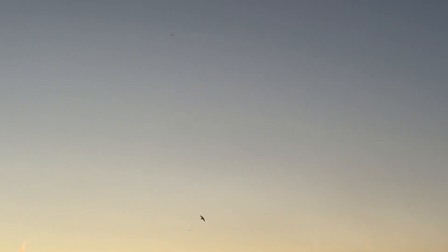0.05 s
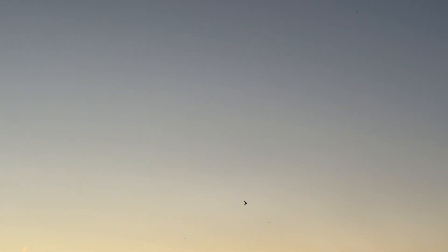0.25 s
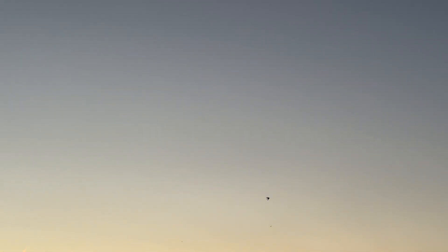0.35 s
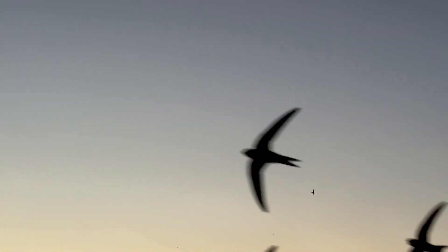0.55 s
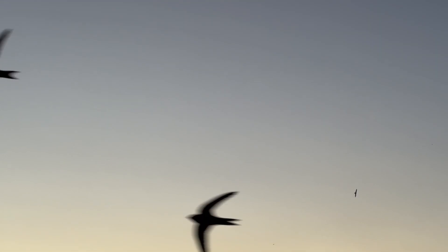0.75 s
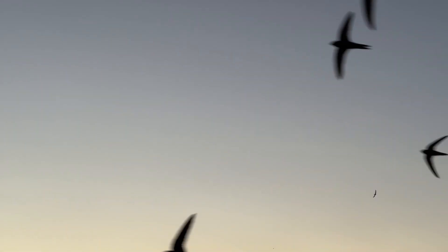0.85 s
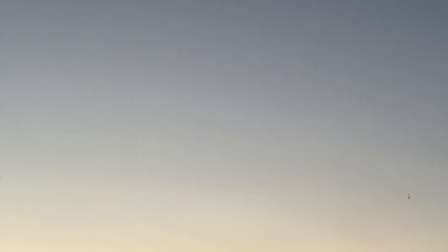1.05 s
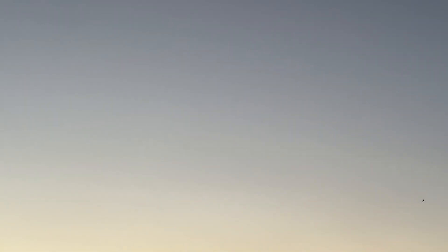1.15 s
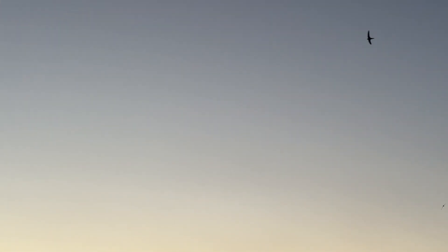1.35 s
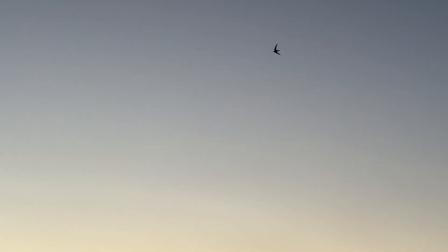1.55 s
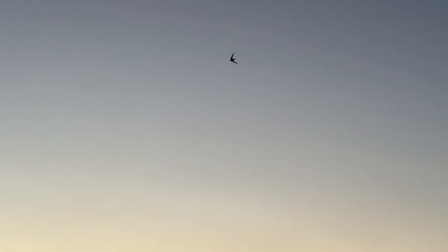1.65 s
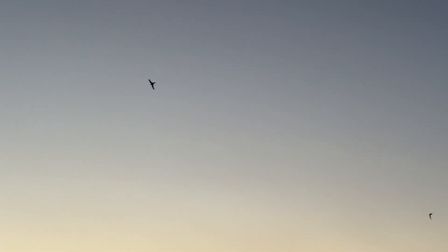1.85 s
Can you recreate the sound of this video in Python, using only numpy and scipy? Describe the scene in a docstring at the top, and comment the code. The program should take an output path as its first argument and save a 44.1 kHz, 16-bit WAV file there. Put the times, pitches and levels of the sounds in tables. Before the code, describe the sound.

Swifts scream in open air, starting faintly and swelling from 0.2 s. Very high, thin whistles scoop upward and trill rapidly, overlapping and loudest at about 0.5-0.9 s as the birds pass close. Rapid ticking chatter cuts in around 0.65-1.0 s, with descending pips until 1.1 s. Slight dull echoes follow. Weaker calls trail off to 1.9 s over a blurred distant flock and faint low hum.

```python
"""Open air at dusk, with roofs and walls about: a party of swifts races low over the microphone and draws away.
They scream over one another: each scream is a whistle near 6 kHz that scoops upward under a very fast trill.
Short pips of the same voice and the chatter of the nearest birds, in falling ticks, cut through; coloured noise
follows the loudness of both. There are dull echoes of scattered noise, a few faint low undertones made of
gliding sines, and, behind, a far flock and a low hum, both made of coloured noise."""
import sys
import numpy as np
from scipy import signal
from scipy.fft import rfft, irfft
from scipy.io import wavfile
from scipy.ndimage import uniform_filter1d

SR = 44100
rng = np.random.default_rng(int(sys.argv[2]) if len(sys.argv) > 2 else 0)


def generate_wav(signal):
    """Clip the signal to [-1, 1] and save it as 16-bit WAV at the path in sys.argv[1]."""
    frames = np.transpose(np.atleast_2d(signal))
    scaled = np.clip(frames, -1, 1) * 32767
    pcm = np.round(scaled).astype(np.int16)
    wavfile.write(sys.argv[1], SR, pcm)


N = 83790  # samples, 1.9 s

# level of the partials and noise around the whistle, lowest once the birds face away: (time [s], level [dB])
RICHNESS = [(.1, 5), (.35, -1.5), (.9, 1), (1.2, -6)]


def screams():
    """Long calls overhead that scoop up clean, level off and trill ever more deeply."""
    # one row per scream: (full trill depth [Hz], its curve of (time [s], pitch [Hz], level [dB]))
    scream_curves = [ (292, [(.017, 4370, -50), (.026, 5260, -47.5), (.055, 5960, -40), (.12, 6200, -36.5),
                     (.27, 6700, -31.5)]), (180, [(.126, 4605, -61), (.138, 5395, -41.5), (.16, 5990, -38),
                     (.24, 6140, -47)]), (444, [(.202, 5070, -41), (.215, 5850, -33.5), (.24, 6490, -26),
                     (.3, 6830, -22.5), (.365, 7050, -22.5), (.42, 7010, -23), (.48, 6670, -24),
                     (.54, 6500, -31)]), (148, [(.219, 4690, -48.5), (.24, 5450, -36.5), (.29, 6090, -32),
                     (.39, 6290, -28.5), (.515, 6290, -23.5)]), (148, [(.473, 4483, -48.5),
                     (.49, 5000, -42.5), (.562, 5700, -42), (.572, 5720, -26.5), (.595, 5890, -21.5),
                     (.63, 6565, -18)]), (100, [(.55, 5222, -30), (.558, 5862, -28), (.6, 6238, -27),
                     (.73, 6072, -21.5)]), (107, [(.507, 5330, -31), (.525, 5940, -20), (.55, 6130, -18.5),
                     (.625, 6260, -21), (.69, 6168, -15.5), (.725, 5940, -21.5)]),
                     (240, [(.587, 4450, -40.5), (.604, 5590, -33), (.635, 5900, -25.5), (.73, 6050, -25),
                     (.742, 6106, -18), (.8, 6177, -21.5), (.86, 6183, -21), (.902, 6270, -22.5)]),
                     (120, [(.625, 5300, -28), (.655, 5934, -35), (.78, 5835, -36)]),
                     (200, [(.772, 4820, -30), (.789, 5600, -23), (.812, 5885, -23), (.9, 5955, -38)]),
                     (99, [(.83, 4950, -37), (.852, 5466, -30), (.895, 5557, -31.5), (.925, 5650, -37),
                     (1.06, 5890, -41)]), (150, [(1.064, 4070, -54), (1.105, 4240, -53),
                     (1.148, 4900, -48)]), (110, [(1.078, 4900, -42), (1.1, 5480, -34.5),
                     (1.14, 5840, -36.5), (1.18, 5900, -41.5), (1.245, 6000, -36), (1.39, 5960, -56)]),
                     (50, [(1.133, 4220, -43), (1.16, 5025, -33.5), (1.184, 4920, -41), (1.197, 5400, -38),
                     (1.255, 5426, -37.5), (1.335, 5410, -50), (1.42, 5290, -50), (1.445, 5470, -46),
                     (1.48, 5440, -52), (1.57, 5310, -51)]), (70, [(1.566, 4650, -54), (1.582, 5060, -54),
                     (1.69, 5290, -75)]), (75, [(1.642, 4580, -52), (1.665, 4740, -48.5),
                     (1.695, 5120, -61), (1.728, 5396, -44), (1.76, 5600, -48), (1.88, 5660, -53)]),
                     (50, [(1.885, 4500, -60), (1.93, 4900, -55)]), ]
    attack_s, release_s = 0.0033, 0.011
    start_depth_hz = 53.7
    grown_share = 0.68  # share of the scream after which the trill is full
    out = np.zeros(N)
    for full_depth_hz, curve in scream_curves:
        times, pitches, levels = np.transpose(curve)
        start, end = times[0], times[-1]
        t = np.arange(start, end, 1 / SR)
        edges = np.clip(np.minimum((t - start) / attack_s, (end - t) / release_s), 0, 1)
        growth = np.minimum(np.linspace(0, 1, len(t)) / grown_share, 1) ** 2
        depth_hz = start_depth_hz + (full_depth_hz - start_depth_hz) * growth
        hz = np.interp(t, times, pitches)
        db = np.interp(t, times, levels)
        add(out, start, edges * voice(start, hz, db, depth_hz))
    return out


def voice(start, hz, db, depth_hz):
    """A whistle and its partials; an uneven trill shakes the pitch, and the sound pulses loudest as it falls."""
    # partials: multiples of the whistle's pitch [ratio], and beside them their levels [dB]
    multiples = [.5, 1, 1.5, 2, 2.5]
    partial_db = [-44.5, -1, -27, -18, -38]
    # colour of throat and beak on the partials other than the whistle: (frequency [Hz], level [dB])
    throat = [(10500, 0), (12300, 0.5), (13800, -3.5), (15300, 2)]
    trill_hz, trill_wander = 255.1, 0.057  # middle pace; wander as a share of it
    trill_uneven = 0.25  # spread of the depth, as a share
    jitter_hz, waver_hz = 33.6, 13.2  # quick and slower spread of pitch
    pulse_scale_hz, pulse_lag_rad = 510, 0.1  # trill depth at which pulsing nears its full strength
    flutter_db, swell_db = 2, 1.07  # spread for each partial, and for the whole voice

    size = len(hz)
    pace_wander = rng.normal() + 2 * drift(171, size)  # one draw per call, plus a moving part
    trill = phase_of(trill_hz * (1 + trill_wander * pace_wander))
    swing = depth_hz * (1 + trill_uneven * drift(230, size)) * np.cos(trill)
    unsteadiness = jitter_hz * drift(650, size) + waver_hz * drift(53.3, size)
    phase = phase_of(hz + swing + unsteadiness)
    pulsing = 1 + np.tanh(depth_hz / pulse_scale_hz) * np.sin(trill - pulse_lag_rad)
    richness = np.interp(start + np.arange(size) / SR, *np.transpose(RICHNESS))
    tone = np.zeros(size)
    for multiple, level in zip(multiples, partial_db):
        colour = richness + np.interp(multiple * hz, *np.transpose(throat))
        if multiple == 1:
            colour = 0  # the whistle itself keeps its level
        gain = from_db(db + level + colour + flutter_db * drift(184, size))
        tone += gain * np.sin(multiple * phase)
    swell = from_db(swell_db * drift(14.3, size))
    return np.sqrt(2) * tone * pulsing * swell


def pips():
    """Brief, slightly falling bursts of the same voice."""
    # one row per pip: (time of its middle [s], middle pitch [Hz], level [dB])
    pip_list = [(.01, 6420, -38.5), (0.037, 6700, -39), (0.489, 5860, -25), (.563, 6440, -14),
                (.588, 6330, -14.5), (.639, 6250, -21), (.664, 6184, -16), (.904, 6060, -18.5),
                (0.937, 6070, -22.5), (0.963, 5930, -27), (0.992, 5827, -25.5), (1.018, 5730, -30.5),
                (1.046, 5400, -37), (1.073, 5100, -39.5)]
    length_s, fall_hz, trill_depth_hz = 0.011, 205, 135
    out = np.zeros(N)
    u = np.linspace(-.5, .5, int(length_s * SR))
    hump = np.cos(np.pi * u) ** 2
    for middle, hz, db in pip_list:
        pip = hump * voice(middle, hz - fall_hz * u, db, trill_depth_hz)
        add(out, middle - length_s / 2, pip)
    return out


def chatter():
    """Ticks of the nearest birds: steep downward sweeps of a few milliseconds, with their octave."""
    # a tick or a quick run: (time of the first tick's middle [s], ticks [count], middle pitch [Hz], level [dB])
    tick_runs = [(0.649, 1, 5400, -43), (0.664, 1, 4960, -46), (0.732, 4, 4880, -30),
                 (0.753, 1, 4880, -27.5), (0.765, 1, 4780, -33), (0.773, 1, 4800, -30),
                 (0.786, 4, 4820, -31), (0.831, 5, 4740, -31), (0.856, 1, 4540, -34), (.865, 1, 4500, -39),
                 (0.905, 1, 4470, -35), (0.916, 1, 4400, -34), (.924, 1, 4470, -34), (.949, 1, 4640, -31),
                 (0.977, 1, 4390, -35), (1.005, 1, 3850, -46)]
    # the ticks lengthen as the chatter slows: (time [s], length [s])
    tick_length = [(.87, .005), (.92, .008)]
    gap_s, fall_hz, octave_db = 0.0042, 1300, -6  # gap from tick to tick within a run
    scatter_hz, scatter_db = 170, 1.1
    out = np.zeros(N)
    for first, count, hz, db in tick_runs:
        length = np.interp(first, *np.transpose(tick_length))
        u = np.linspace(-.5, .5, int(length * SR))
        hump = np.cos(np.pi * u) ** 2
        for k in range(int(count)):
            phase = phase_of(hz - fall_hz * u + scatter_hz * drift(690, len(u)))
            tick = np.sin(phase) + from_db(octave_db) * np.sin(2 * phase)
            gain = np.sqrt(2) * from_db(db + scatter_db * rng.normal())
            add(out, first + k * gap_s - length / 2, gain * hump * tick)
    return out


def rasp(whistles, ticks):
    """Coloured noise that follows the loudness of the calls."""
    # colour of the noise: (frequency [Hz], level per Hz [dB])
    rasp_colour = [(1500, -9.5), (2600, -15.5), (3400, -6), (4400, -11.5), (9000, 10), (10800, -3),
                   (12300, 8.5), (15500, -33)]
    whistle_db, tick_db = -21.5, -5  # noise relative to each kind of call
    facing = from_db(np.interp(np.arange(N) / SR, *np.transpose(RICHNESS)))
    whistle_envelope = from_db(whistle_db) * facing * loudness(whistles)
    tick_envelope = from_db(tick_db) * loudness(ticks)
    return (whistle_envelope + tick_envelope) * noise(rasp_colour)


def echoes(x):
    """A dull, scattered return from roofs and walls: the calls convolved with a decaying burst of noise."""
    t60_s, delay_s, cut_hz = 0.12, 0.028, 3570
    t = np.arange(SR) / SR
    tail = rng.standard_normal(SR) * from_db(-60 * t / t60_s) * (t > delay_s)
    tail /= np.sqrt(np.sum(tail ** 2))
    dull = signal.butter(2, cut_hz, fs=SR, output="sos")
    return signal.sosfilt(dull, signal.fftconvolve(x, tail)[:N])


def low_undertones():
    """Faint low undertones near 2-3.5 kHz: sines that glide from pitch to pitch."""
    # one row per undertone: (start [s], length [s], start pitch [Hz], end pitch [Hz], level [dB])
    undertones = [(.5, .16, 2806, 2760, -54.5), (0.51, 0.088, 3170, 3535, -53),
                  (1.266, 0.077, 2296, 2004, -56)]
    jitter_hz, flutter_db = 33.6, 2
    out = np.zeros(N)
    for start, length, start_hz, end_hz, db in undertones:
        u = np.linspace(0, 1, int(length * SR))
        hz = start_hz + (end_hz - start_hz) * u + jitter_hz * drift(100, len(u))
        gain = from_db(db + flutter_db * drift(60, len(u)))
        add(out, start, gain * np.sin(np.pi * u) * np.sin(phase_of(hz)))
    return out


def far_flock():
    """The blurred screaming of a distant flock: coloured noise of fluttering level."""
    # colour of the flock: (frequency [Hz], level per Hz [dB])
    flock_colour = [(3800, -27.5), (4700, -18), (5500, 1.5), (6400, -3.5), (7200, -33), (11200, -22.5),
                    (12800, -64)]
    # its course: (time [s], level [dB])
    flock_level = [(0, -57), (.9, -45), (1.9, -53)]
    level = np.interp(np.arange(N) / SR, *np.transpose(flock_level))
    return noise(flock_colour) * from_db(level + 2 * drift(30, N))


def hum():
    """The low outdoor background: steady noise, weighted to the bass."""
    # colour of the background: (frequency [Hz], level per Hz [dB])
    hum_colour = [(45, -0.5), (120, -4.5), (230, -1), (560, -8.5), (1000, -2.5), (1700, -12.5), (2600, -25),
                  (4000, -34)]
    return from_db(-54.5) * noise(hum_colour)


def noise(spectrum):
    """Steady noise of a given colour, rms one, falling away steeply beyond the ends of the table."""
    hz, db = np.transpose(spectrum)
    bins = np.arange(N // 2 + 1) * SR / N + 1e-3  # kept off zero for the logarithm
    beyond = np.minimum(1, np.minimum(bins / hz[0], hz[-1] / bins)) ** 7
    colour = from_db(np.interp(np.log(bins), np.log(hz), db))
    return rms_one(irfft(rfft(rng.standard_normal(N)) * beyond * colour, N))


def drift(rate, size):
    """Smooth random movement with a spread of about one: white noise through two equal low-pass poles [Hz]."""
    r = np.exp(-2 * np.pi * rate / SR)
    white = rng.standard_normal(size + SR // 4)  # a quarter second to settle
    return rms_one(signal.lfilter([1], [1, -2 * r, r * r], white))[-size:]


def loudness(x):
    """Running rms over about two milliseconds, quick enough to follow every pulse."""
    return np.sqrt(np.abs(uniform_filter1d(x ** 2, size=80)))


def phase_of(hz):
    """Running phase of a moving pitch, from a random start."""
    return 2 * np.pi * np.cumsum(hz) / SR + rng.uniform(0, 2 * np.pi)


def from_db(db):
    """Decibels to gain."""
    return 10 ** (np.asarray(db) / 20)


def rms_one(x):
    """Scale to an rms of one."""
    return x / np.sqrt(np.mean(x ** 2) + 1e-20)


def add(out, start, x):
    """Mix a sound in from a start time [s] on."""
    i = int(np.clip(start * SR, 0, N))
    out[i:i + len(x)] += x[:N - i]


def scene():
    """Near swifts with their rasp and echoes, over low undertones, a far flock and the hum."""
    whistles = screams() + pips()
    ticks = chatter()
    swifts = whistles + ticks + rasp(whistles, ticks)
    near = swifts + from_db(-4) * echoes(swifts)
    background = low_undertones() + far_flock() + hum()
    return (near + background)[None]


def record(dry):
    """The top is cut steeply above 15.9 kHz by an elliptic low-pass."""
    steep = signal.ellip(12, .1, 80, 15900, fs=SR, output="sos")
    return signal.sosfilt(steep, dry)


dry = scene()
out = record(dry)
generate_wav(out)
```